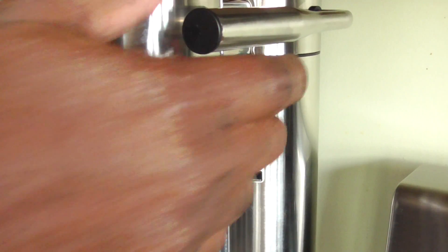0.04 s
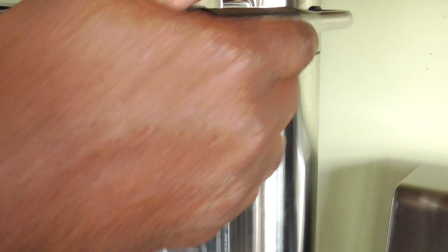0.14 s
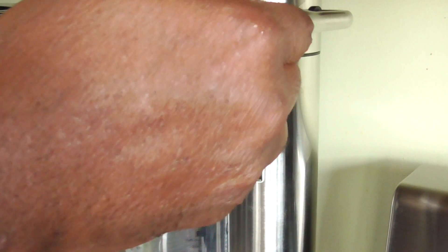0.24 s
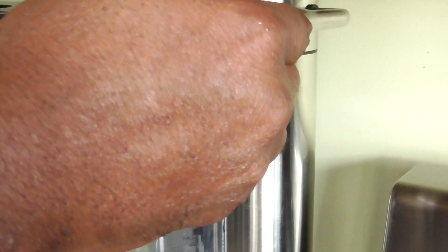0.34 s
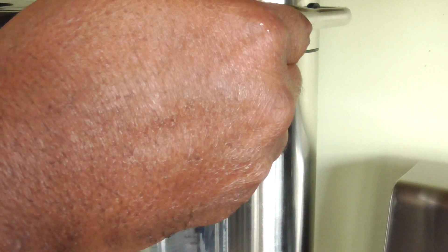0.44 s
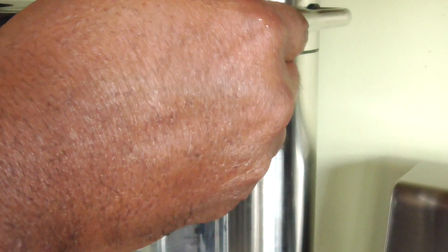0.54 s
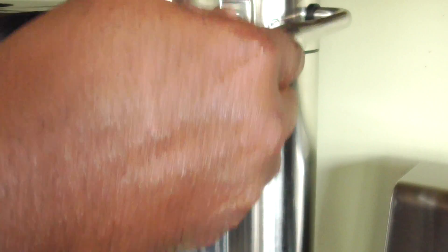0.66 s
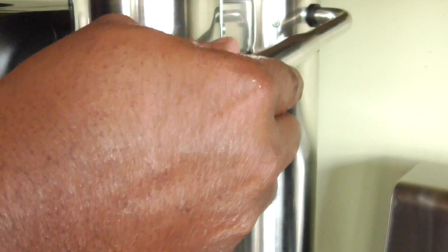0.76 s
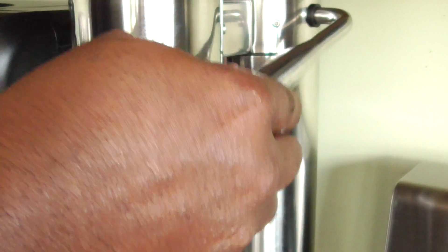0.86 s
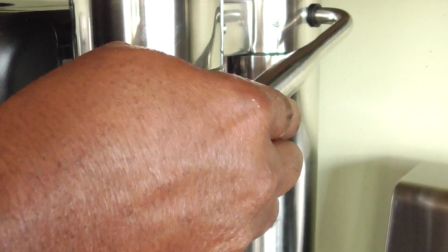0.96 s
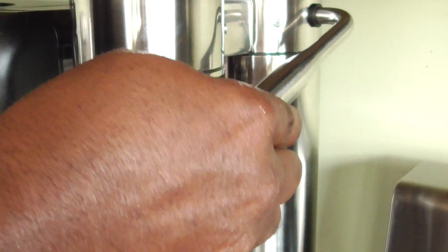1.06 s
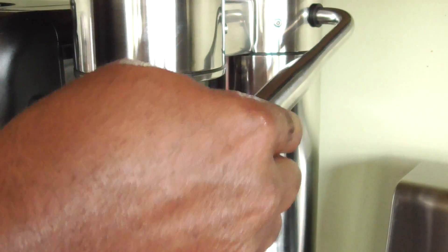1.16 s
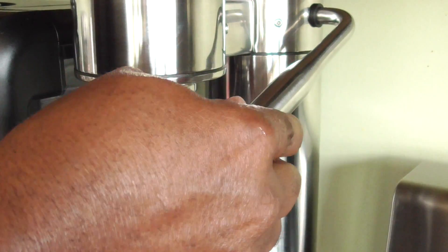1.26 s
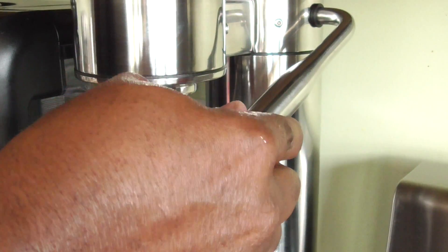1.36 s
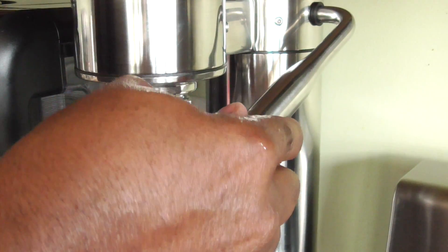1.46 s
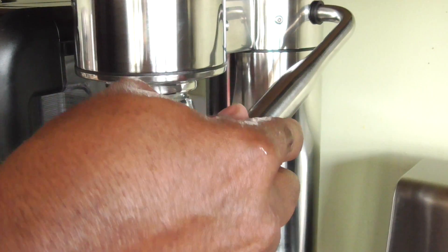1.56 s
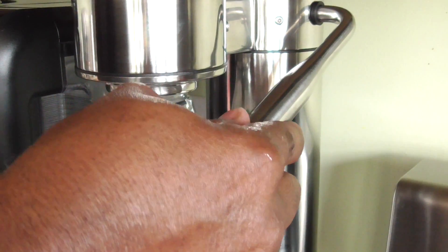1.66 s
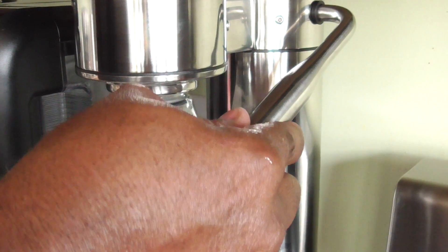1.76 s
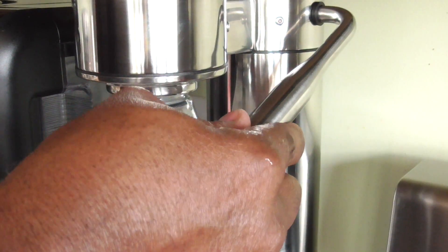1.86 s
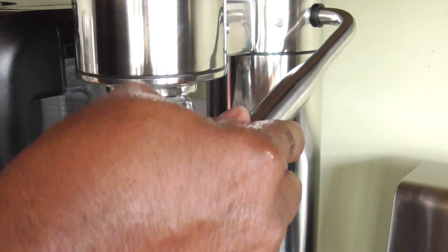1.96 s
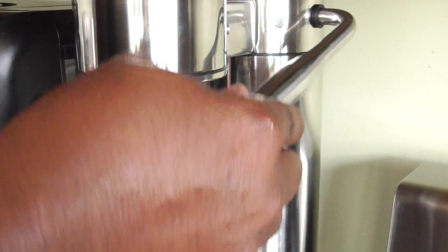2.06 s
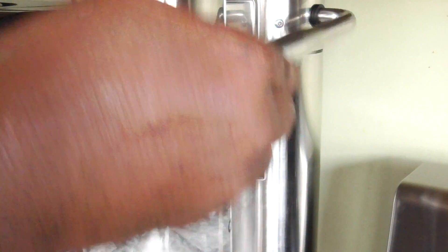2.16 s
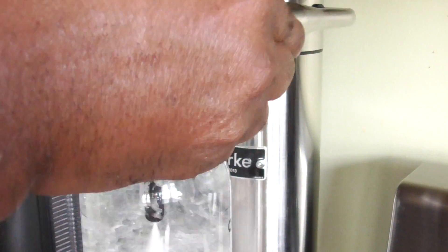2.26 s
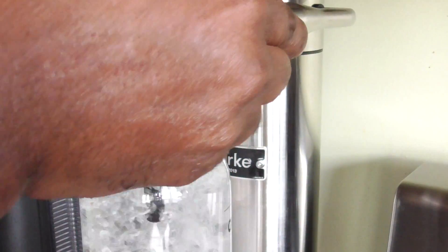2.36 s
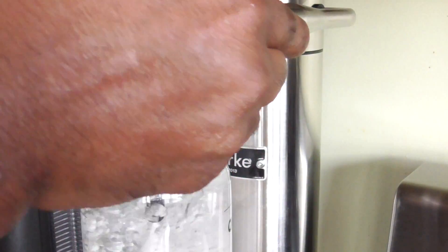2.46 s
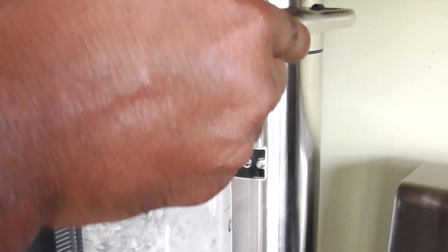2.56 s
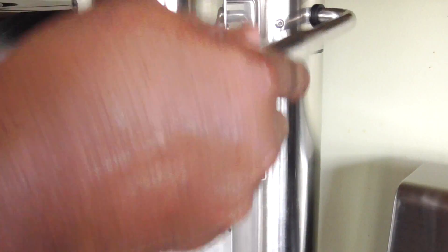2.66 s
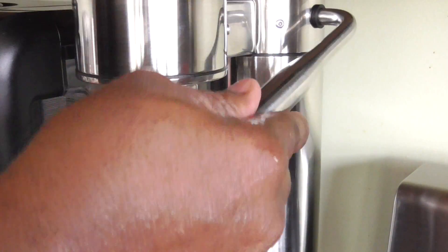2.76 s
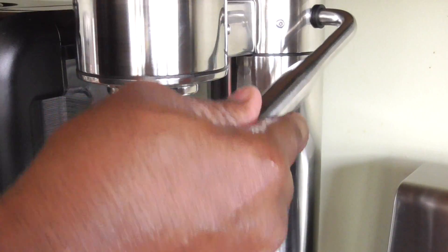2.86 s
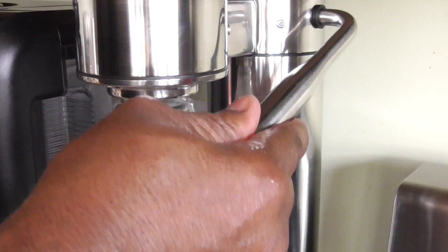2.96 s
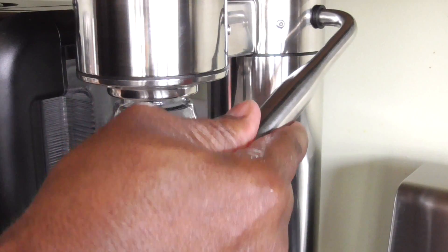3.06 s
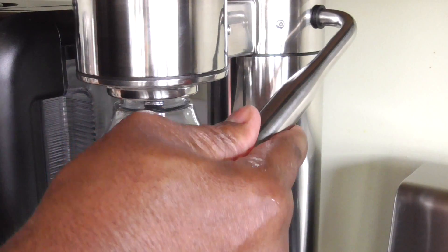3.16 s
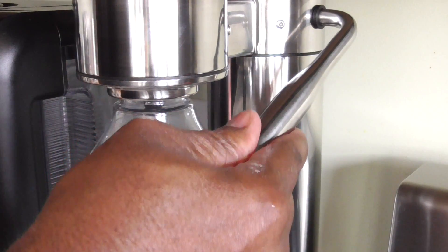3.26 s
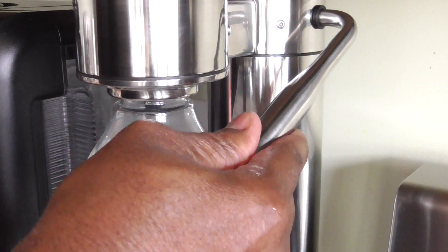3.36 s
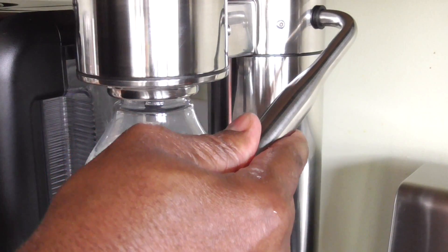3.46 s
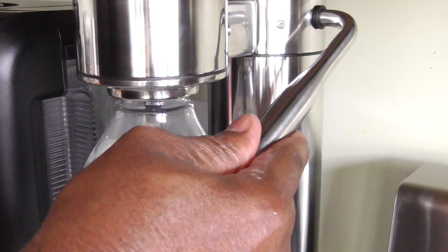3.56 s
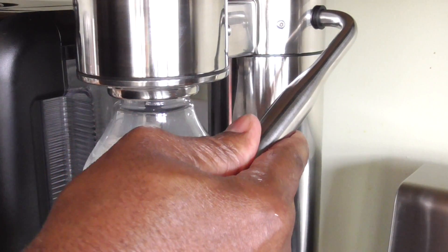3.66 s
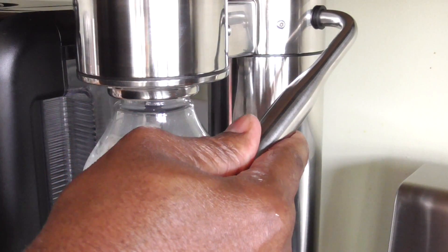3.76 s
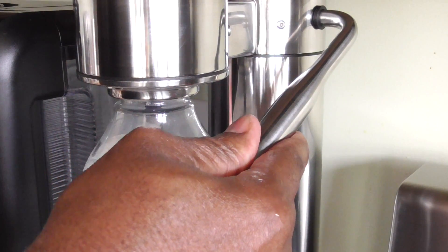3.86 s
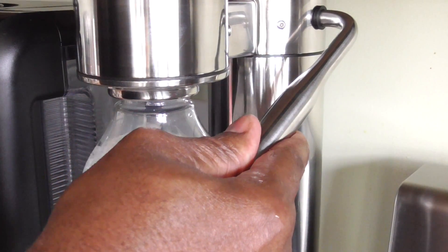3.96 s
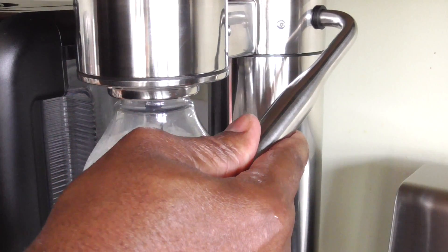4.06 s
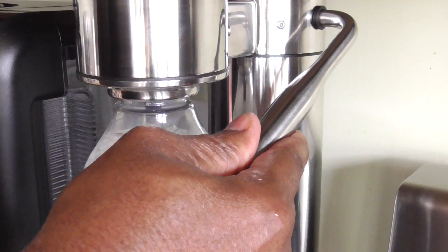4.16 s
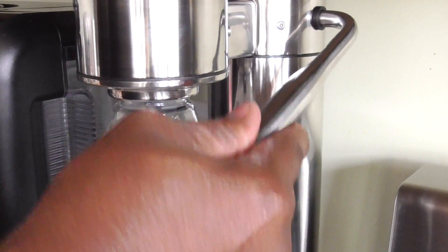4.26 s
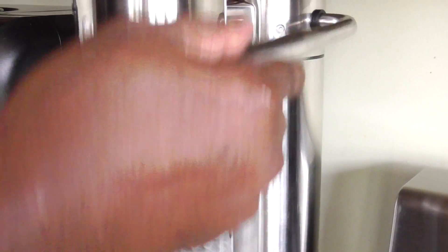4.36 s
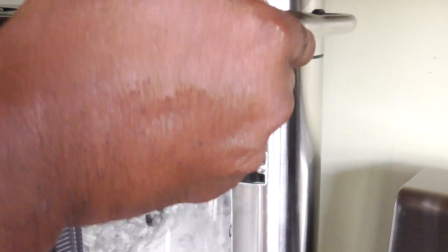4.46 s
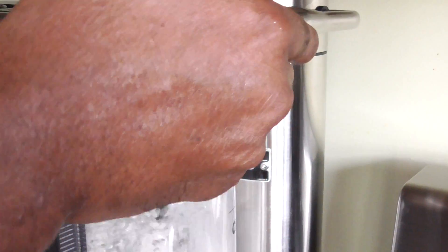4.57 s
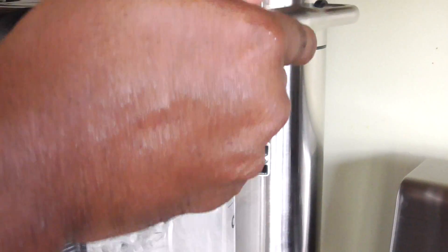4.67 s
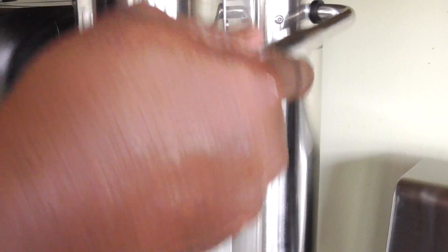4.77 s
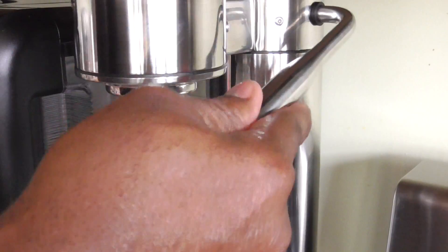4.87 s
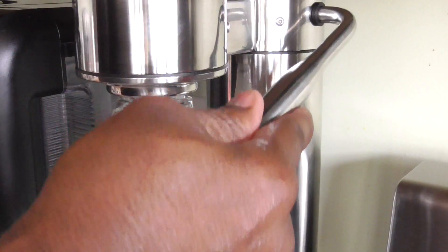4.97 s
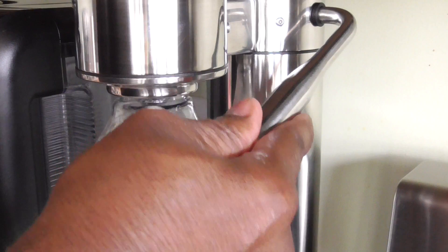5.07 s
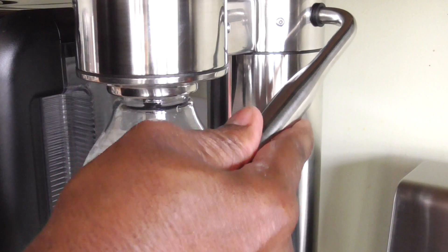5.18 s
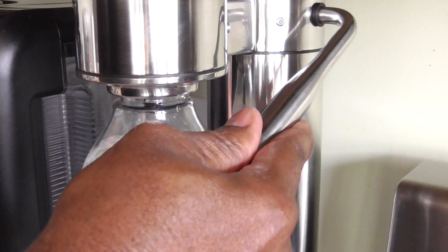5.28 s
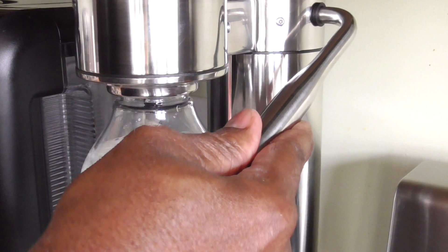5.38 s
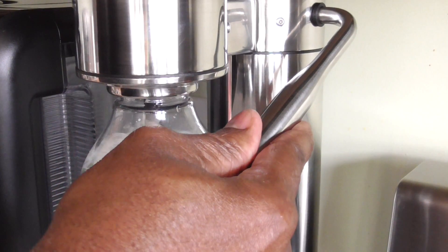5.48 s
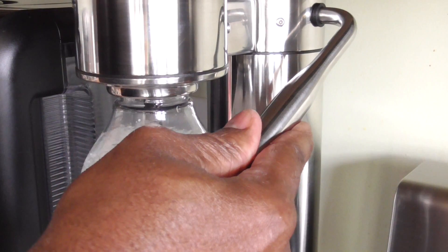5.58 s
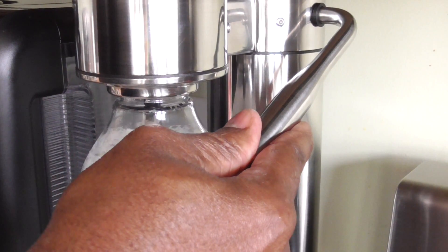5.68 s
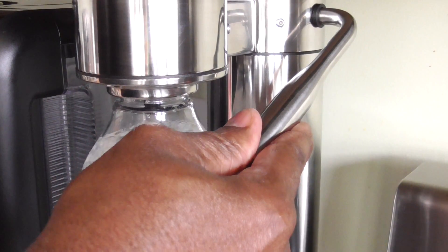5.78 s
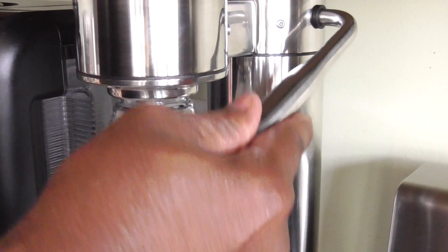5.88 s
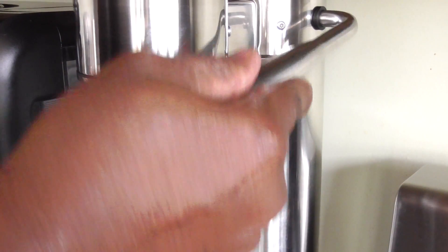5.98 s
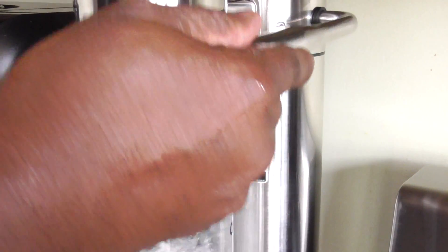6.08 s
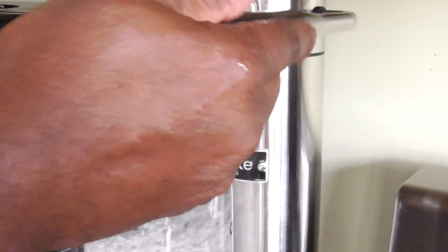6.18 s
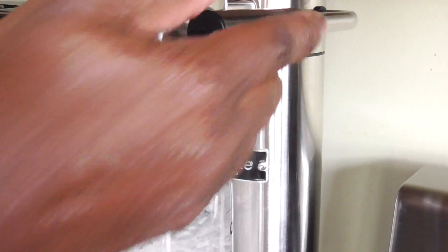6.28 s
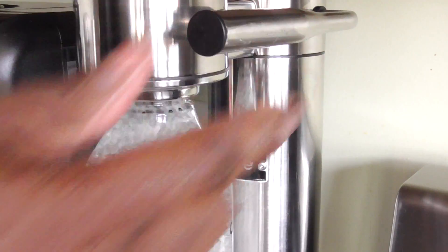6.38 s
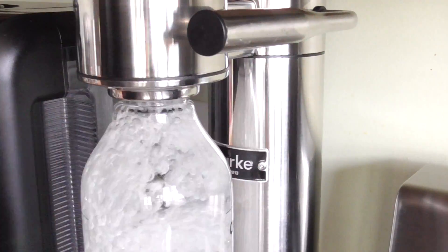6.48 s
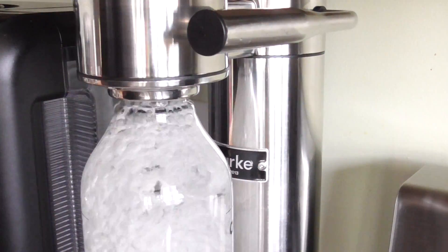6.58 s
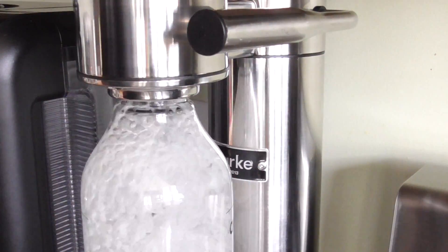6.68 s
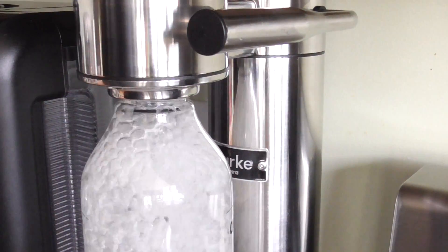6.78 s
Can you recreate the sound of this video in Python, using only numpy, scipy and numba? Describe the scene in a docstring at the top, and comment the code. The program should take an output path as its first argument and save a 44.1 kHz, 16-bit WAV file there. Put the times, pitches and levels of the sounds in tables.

```python
"""Faint ticks of a focus motor over kitchen hum, then the knock of a steel lever: a countertop soda
maker, close by, is pulled three times. On each pull gas whistles through the nozzle and boils into
the water until the bottle is at full pressure. The relief valve then pops, and on the last two pulls
it chatters and squeals. As the lever comes back up, the gas hisses out and the water froths."""
import sys
import numpy as np
from scipy import signal
from scipy.fft import rfft, irfft, next_fast_len
from scipy.io import wavfile
from scipy.ndimage import uniform_filter1d
from numba import njit

SR = 44100
rng = np.random.default_rng(int(sys.argv[2]) if len(sys.argv) > 2 else 0)


def generate_wav(signal):
    """Clip the signal to [-1, 1] and save it as 16-bit WAV at the path in sys.argv[1]."""
    frames = np.transpose(np.atleast_2d(signal))
    scaled = np.clip(frames, -1, 1) * 32767
    pcm = np.round(scaled).astype(np.int16)
    wavfile.write(sys.argv[1], SR, pcm)


N = 301291
T = np.arange(N) / SR

# Levels in the tables are fader settings; each layer adds its own trim.
# kitchen air: freq_hz, gain_db
AIR_EQ = [(25, -8), (70, 1), (150, 1.5), (300, 0), (550, -2), (930, -4), (1300, -15), (2400, -26),
          (4200, -24.5), (6000, -30), (9000, -23), (16000, -29)]
# motor hum: pitch_hz, level_db
HUM_PARTIALS = [(119, -64.5), (237, -61)]
# room tone sinks under the gas, then partly returns: time_s, gain_db
ROOM_FADER = [(1.28, 0), (2.3, -14), (6.83, -5.5)]

# the lever takes up its play: start_s, level_db, scrape_boost_db
LEVER_KNOCKS = [(.488, -57, 7), (0.7173, -30.5, 1.5), (.7245, -29.5, 0), (.753, -47, 5), (1.044, -49, -6)]
# ring of the steel lever: pitch_hz, level_db, t60_s
LEVER_MODES = [(342, -6, .31), (1007, 0.5, .15), (1464, -11, .22), (2056, -13, 0.14), (2525, -12, .22)]
# ring of the machine head at a damping of 1: pitch_hz, level_db, t60_s
HEAD_MODES = [(339.5, -12, 0.11), (561, -9, 0.041), (704, 2.5, 0.045), (780, -5, 0.035), (840, -2.5, 0.059),
              (945, -1, 0.038), (1050, 0, 0.035), (1115, -11.5, 0.031), (1510, -13.5, 0.033),
              (1800, -11.5, 0.029), (4180, -12, .02)]
# lever scrape: freq_hz, gain_db
SCRAPE_EQ = [(150, -6), (340, 9), (520, 2), (1500, 3.5), (4200, -4.5), (9000, -11.5), (15000, -22)]

# first big bubbles out of the nozzle: start_s, pitch_hz, level_db, ring_cycles
GULP_BUBBLES = [(1.2905, 758, -3.5, 53), (1.295, 685, -17, 36), (1.293, 1420, -20, 77),
                (1.524, 641, -10, 28), (1.541, 805.4, -10, 25)]
# their spray: freq_hz, gain_db
SPRAY_EQ = [(200, -22), (450, 0.5), (5000, 0.5), (7000, -6), (12500, -10.5), (15000, -22)]
# lever pulls, with their jet, large and fine bubbles and churn: crack_s, open_s, full_s, jet_db,
# large_first_db, large_mid_db, large_first_hz, fine_first_db, fine_last_db, churn_db
LEVER_PULLS = [(1.287, 1.323, 2.26, -47.5, -39.5, -27, 863, -45.5, -29.5, -43),
               (3.011, 3.037, 3.975, -48.5, -37.5, -30.5, 900, -41, -30, -46),
               (5.039, 5.129, 5.305, -49.5, -49.5, -42.5, 1108, -37, -34.5, -65)]
# hiss of the gas jet: freq_hz, gain_db
JET_EQ = [(100, -23), (400, -8), (1000, 2.5), (4500, 0.5), (6400, 0), (8300, 1.5), (11000, -1), (12600, -8),
          (13600, -20), (16000, -28)]
# bottle wall, heard on the fine bubbles: freq_hz, gain_db
BOTTLE_EQ = [(2000, 5), (2700, -4), (3200, -1), (4200, -2.5), (4550, 3), (4800, -5), (5100, 4),
             (6200, -4.5)]
# rumble of moving water: freq_hz, gain_db
WATER_EQ = [(45, -29), (80, -14), (100, -16.5), (116, 1.5), (128, 0.5), (160, -13), (200, -9), (265, -22),
            (380, -14), (600, -24.5), (1200, -40)]
# big heaves of the water: peak_s, level_db
WATER_HEAVES = [(1.56, -37.5), (1.76, -38), (3.39, -43), (3.61, -45.5), (4.23, -40.5), (5.51, -46)]
# runs of like-sized bubbles: start_s, end_s, first_hz, last_hz, level_db
GURGLES = [(1.402, 1.435, 1050, 760, -35), (1.435, 1.495, 1760, 2080, -33.5),
           (1.526, 1.581, 647, 1300, -31), (1.554, 1.6, 1700, 2000, -29.5), (1.68, 1.76, 960, 880, -31),
           (1.8, 1.87, 1300, 1200, -29), (1.85, 1.93, 740, 1040, -30), (2.02, 2.065, 1120, 1400, -31),
           (2.176, 2.22, 1020, 980, -30.5), (2.2, 2.228, 3550, 3950, -30.5),
           (2.255, 2.299, 3200, 2700, -35), (3.33, 3.385, 1080, 930, -29.5), (3.585, 3.63, 1250, 1700, -34),
           (3.465, 3.51, 4250, 3900, -34), (3.613, 3.638, 3998, 4130, -31), (3.695, 3.718, 1000, 1000, -33),
           (3.753, 3.798, 3200, 2950, -35), (3.802, 3.828, 990, 960, -31), (3.818, 3.842, 3300, 3150, -33)]

# passage that the whistle sounds through: freq_hz, gain_db
NOZZLE_EQ = [(2000, -19.5), (3000, -11), (4400, -22), (6000, -19.5), (6800, -4), (7950, 1), (8120, -7),
             (8950, -2), (9900, -6.5), (10120, -2), (11200, -17), (12100, -16.5), (14000, -38)]
# warble as the valve is first eased open: time_s, pitch_hz, level_db, squeal_db
WARBLE_PATH = [(1.522, 2130, -51, 16), (1.534, 2090, -29, 17), (1.56, 1850, -33.5, 17.5),
               (1.582, 1890, -34.5, 17), (1.601, 2130, -29.5, 24), (1.609, 2470, -27, 19),
               (1.634, 2180, -32, 18.5), (1.668, 2080, -29.5, 5), (1.682, 1950, -28, 6),
               (1.723, 1845, -32, 3), (1.742, 2225, -28.5, 0), (1.785, 2205, -30, -2),
               (1.808, 2090, -29, -2), (1.826, 1985, -37, -2)]
# chirps as the valve shifts: peak_s, top_hz, low_hz, level_db, squeal_db
NOZZLE_CHIRPS = [(3.068, 2990, 2380, -30, 12), (3.147, 2480, 2190, -29, 0), (5.137, 3335, 2400, -29.5, 4),
                 (5.208, 2450, 2260, -32.5, 8)]
# the whistle locks on a note: start_s, end_s, pitch_hz, level_db, roughness_ratio
HELD_NOTES = [(1.822, 2.066, 1984, -24, .0045), (2.091, 2.15, 2240, -34, .012),
              (3.21, 3.35, 2235, -31, .005), (3.367, 3.445, 1990, -26.5, .015),
              (3.451, 3.64, 2022, -31, .005), (3.645, 3.976, 1984, -24.5, .003),
              (5.228, 5.308, 2245, -31, .004)]

# relief valve snapping open: peak_s, level_db, rise_s, t60_s
VALVE_POPS = [(2.316, -20, .05, 0.072), (3.048, -21, .02, 0.039), (3.9825, -11.5, .001, 0.015),
              (5.312, -18.5, .002, 0.024)]
# spells of valve chatter: start_s, end_s, hiss_db, knock_db
CHATTER_SPELLS = [(3.983, 4.132, -24, -35.5), (4.171, 4.583, -23, -34), (5.314, 5.546, -23.5, -33.5),
                  (5.593, 6.103, -24.5, -36), (6.164, 6.312, -24, -36)]
# gas spat from the valve: freq_hz, gain_db
SPIT_EQ = [(80, -23), (200, -13.5), (500, -12), (1400, -7.5), (2400, -7), (4200, -2.5), (6400, -4),
           (7100, 3), (7500, 0), (10500, -0.5), (12500, -3), (13400, -10), (14500, -8.5), (16000, -21)]
# resonances of the valve's port: centre_hz, width_hz, gain_db
PORT_PEAKS = [(1800, 140, 3), (5300, 95, 5.5), (7150, 200, 1.5)]

# gas let out as the lever rises:
# start_s, end_s, attack_s, release_s, rush_db, top_db, note_db, note_first_hz
VENT_BLASTS = [(2.318, 2.789, .05, 0.15, -23, -27, -28, 14000),
               (4.594, 4.775, 0.047, 0.48, -24, -26, -26.5, 12050),
               (6.308, 6.394, 0.13, 0.75, -26.5, -27.5, -29.5, 11420),
               (6.757, 6.83, 1.3, .8, -31, -34, -34, 11600)]
# body of the vent's rush: freq_hz, gain_db
RUSH_EQ = [(150, -40), (600, -28), (1700, -19.5), (3600, -11.5), (4400, -6), (6400, -4.5), (7000, -5),
           (7800, 1), (9000, -2), (10500, -8), (13000, -23)]
# its sharp top: freq_hz, gain_db
TOP_EQ = [(6000, -52), (9500, -26.5), (10900, -5), (11700, 1.5), (12400, -2.5), (13400, -3.5), (15000, -5),
          (16000, -12)]
# hollow resonances and notches of the vent passage: centre_hz, width_hz, gain_db
VENT_PEAKS = [(1480, 120, 5.5), (1690, 160, -10), (2250, 200, 3.5), (2630, 110, -14), (2870, 130, 5),
              (3370, 220, 5.5), (3620, 130, -14), (5880, 200, 2)]
# the water froths as the pressure drops: start_s, end_s, level_db
FROTH_BOUTS = [(2.32, 2.327, -47.5), (2.75, 2.816, -48), (4.741, 4.899, -52.5), (6.338, 6.35, -37.5),
               (6.547, 6.83, -42.5)]
# the relief valve hangs half open: start_s, end_s, pitch_hz, hiss_db, partial_1_db ... partial_5_db
VALVE_STALLS = [(4.138, 4.169, 1783, -25, -47, -46, -48, -40, -41),
                (5.555, 5.618, 1812, -25.5, -45, -39.5, -48, -36, -39),
                (6.112, 6.16, 1820, -27.5, -42, -47, -36.5, -42, -33.5)]

# first echoes off hard surfaces close by: left_delay_s, right_delay_s, level_db
EARLY_ECHOES = [(.00085, 0.00093, -19.5), (.0034, 0.0035, -14.5)]
# the machine stands a little to the right: freq_hz, left_minus_right_db
PAN_EQ = [(110, 1.5), (700, -0.5), (2400, -1.5), (4400, -1.5), (8100, -2.5), (15000, -8)]

TOP_HZ = 15700


def undb(db):
    """Decibels to gain."""
    return np.exp(np.asarray(db) * (np.log(10) / 20))


def unit(x):
    """Scale to rms 1."""
    return x / np.sqrt(np.mean(x ** 2))


def curve(rows, column=1):
    """One column of a table, joined by straight lines in time."""
    rows = np.array(rows)
    return np.interp(T, rows[:, 0], rows[:, column])


def walk(rate_hz, t=T):
    """Smooth random drift with a spread near 1."""
    knots = rng.standard_normal(N // 20)
    return np.interp(t * rate_hz, np.arange(len(knots)), knots)


def gate(start, end, attack_s, release_s, t=T):
    """Full between start and end; rises and falls by 60 dB over attack and release."""
    outside = np.maximum(start - t, 0) / attack_s + np.maximum(t - end, 0) / release_s
    return undb(-60 * np.minimum(outside, 5))


def burst(start, t60):
    """A hard attack and an exponential fall."""
    return (T >= start) * undb(-60 * np.clip((T - start) / t60, 0, 5))


def progress(start, end):
    """A ramp from 0 to 1 between two moments."""
    return np.clip((T - start) / (end - start), 0, 1)


def fade(start, db_per_s, t=T):
    """A steady loss of level after the start."""
    return undb(-db_per_s * np.maximum(t - start, 0))


def colour(x, eq, amount=1):
    """Filter through an EQ curve of freq_hz, gain_db points."""
    hz, db = np.transpose(eq)
    size = next_fast_len(N + 4096, real=True)
    f = np.maximum(np.fft.rfftfreq(size, 1 / SR), 1)
    gain = undb(amount * np.interp(np.log(f), np.log(hz), db))
    return irfft(rfft(x, size) * gain, size)[..., :N]


def pipe(eq, peaks):
    """An EQ curve with the resonances and notches of a passage laid over it."""
    hz, db = np.transpose(eq)
    f = np.geomspace(hz[0], hz[-1], 1200)
    lift = sum(gain_db / (1 + (2 * (f - centre) / width) ** 2) for centre, width, gain_db in peaks)
    return np.column_stack([f, np.interp(np.log(f), np.log(hz), db) + lift])


def hiss(eq, spread):
    """Stereo turbulence, wider towards the treble."""
    side = spread * colour(rng.standard_normal(N), [(300, -4.5), (3000, -5), (9000, 0)])
    return unit(colour(rng.standard_normal(N) + side * np.array([[1], [-1]]), eq))


def reverberate(x, t60, wet_db):
    """Add a short dense tail, different at each ear."""
    t = T[:SR // 3]
    tail = rng.standard_normal((2, len(t))) * undb(-60 * t / t60) * (t > .002)
    tail /= np.sqrt(np.sum(tail ** 2, axis=1, keepdims=True))
    return x + undb(wet_db) * signal.fftconvolve(np.atleast_2d(x), tail, axes=1)[:, :N]


@njit
def rings(start, hz, cycles, size, glide):
    """Sine pings that die by 60 dB over their cycles; glide bends them upward like bubbles."""
    out = np.zeros(N)
    for k in range(len(start)):
        first, count = int(start[k] * SR), int(cycles[k] / hz[k] * SR) + 2
        spring = 2 * np.sin(np.pi * hz[k] / SR)
        stiffen = (2 * np.sin(np.pi * hz[k] * (1 + glide) / SR) - spring) / count
        loss, swell = np.exp(-6.9 / count), np.exp(-spring / 4)
        gain, onset, place, speed = size[k], 1., 0., 1.
        for i in range(first, min(first + count, N)):
            place += spring * speed
            speed -= spring * place
            spring, gain, onset = spring + stiffen, gain * loss, onset * swell
            out[i] += gain * (1 - onset) * place
    return out


def bubbles(centre_hz, per_s, scatter, cycles, range_db):
    """A stream of bubbles scattered round a centre pitch, levelled to an rms of 1."""
    when, pitch, life, size = rng.random((int(per_s * N / SR), 4)).T
    when = when * T[-1]
    octaves = scatter * .5 * np.log((pitch + .02) / (1.02 - pitch))
    hz = np.interp(when, T, centre_hz + 0 * T) * 2 ** octaves
    gain = undb(-range_db * size) * np.sqrt(hz)
    stream = rings(when, np.minimum(hz, SR / 3), cycles * (.5 + life), gain, glide=0.083)
    return stream / np.sqrt(np.abs(uniform_filter1d(stream ** 2, size=1400)) + 1e-9)


def room_tone():
    """The bed: kitchen air and the wavering hum of a motor."""
    hum = 0
    for hz, db in HUM_PARTIALS:
        phase = 2 * np.pi * np.cumsum(hz * (1 + 0.0058 * walk(8))) / SR
        hum += undb(db) * np.sqrt(2) * np.sin(phase)
    air = hiss(AIR_EQ, spread=0.91) * undb(-54.5 + .8 * walk(5.4))
    return (air + hum) * undb(curve(ROOM_FADER))


def focus_ticks(start_s=.1269, step_s=.01669, count=69, low_hz=2400., high_hz=3750., cycles=20.):
    """A small focus motor close by steps evenly, ticking faintly on two notes in turn."""
    steps = np.arange(count)
    hz = np.where(steps % 2, high_hz, low_hz)
    gain = undb(-50 - 13 * rng.random(count)) * low_hz / hz
    return rings(start_s + step_s * steps, hz, np.full(count, cycles), gain, glide=0.)


def lever(ring_db=-11, tail_db=-19, tail_s=0.28):
    """The lever takes up its play: a knock through the head, a short scrape, then ringing steel."""
    push = sum(undb(db) * burst(s, 0.0043) for s, db, _ in LEVER_KNOCKS) * rng.standard_normal(N)
    t = T[:SR // 2]
    steel = sum(undb(db - 60 * t / t60) * np.sin(2 * np.pi * hz * t) for hz, db, t60 in LEVER_MODES)
    ringing, scrape = np.zeros((2, N))
    for s, db, boost_db in LEVER_KNOCKS:
        ringing[int(s * SR):][:len(t)] += undb(db + ring_db) * steel
        scrape += undb(db + boost_db) * (burst(s, 0.037) + undb(tail_db) * burst(s, tail_s))
    return 0.27 * head(push, damping=0.53) + ringing + 0.64 * scrape * hiss(SCRAPE_EQ, spread=.5)


def head(push, damping):
    """The machine head rings with whatever pushes it."""
    t = T[:SR // 5]
    ring = sum((-1) ** k * undb(db - 60 * t * damping / t60) * np.sin(2 * np.pi * hz * t)
               for k, (hz, db, t60) in enumerate(HEAD_MODES))
    return signal.fftconvolve(push, ring / np.abs(ring).max())[:N]


def gulps(rise_s=0.0075):
    """Big bubbles swell over a few cycles and ring; the first comes with a spurt of spray."""
    out = 0
    for s, hz, db, cycles in GULP_BUBBLES:
        envelope = burst(s, cycles / hz) * progress(s, s + rise_s) ** 2
        out += undb(db) * envelope * np.sin(2 * np.pi * hz * (T - s))
    spray_db = np.interp(T, [1.278, 1.296, 1.312, 1.335], [-56, -26.5, -39, -52], left=-200, right=-200)
    return out + undb(spray_db) * hiss(SPRAY_EQ, spread=.4)


def injection(seep_db=-17.5, overrun_s=.04, rise_oct=0.36, fade_db=7.5, clump_db=1.4, wander_oct=.12):
    """The jet hisses and breaks into bubbles in the bottle; rising pressure favours the fine ones."""
    jet_gain = large_gain = fine_gain = 0
    large_hz = LEVER_PULLS[0][6]
    for crack, opened, full, jet_db, early_db, mid_db, first_hz, first_db, last_db, _ in LEVER_PULLS:
        # gas seeps as the valve cracks, then flows fully until just after the bottle is full
        opening = undb(seep_db * (1 - progress(crack, opened) ** 2))
        flow = gate(crack, full + overrun_s, 0.017, 0.09) * opening
        filled = progress(opened, full)
        jet_gain += flow * undb(jet_db)
        # large bubbles peak in mid-pull and shrink as the pressure builds
        drop_db = np.where(filled < .5, mid_db - early_db, fade_db) * (2 * filled - 1) ** 2
        large_gain += flow * undb(mid_db - drop_db)
        large_hz = np.where(T >= crack, first_hz * 2 ** (rise_oct * filled), large_hz)
        fine_gain += flow * undb(first_db + (last_db - first_db) * filled ** 0.74)
    jet = hiss(JET_EQ, spread=0.72) * undb(11.5 + 2.1 * walk(90)) * jet_gain
    # gas tears off the jet in slugs, so the bubbles come in clumps of like size
    large_hz = large_hz * 2 ** (wander_oct * walk(40))
    large = bubbles(large_hz, per_s=1100, scatter=0.41, cycles=40, range_db=8)
    large *= large_gain * undb(-3.3 + clump_db * walk(45))
    fine_hz = 3350 * 2 ** (wander_oct * walk(60))
    fine = bubbles(fine_hz, per_s=2600, scatter=0.48, cycles=65, range_db=9)
    fine = colour(fine, BOTTLE_EQ) * fine_gain * undb(clump_db * walk(35))
    return jet + reverberate(large + fine + gurgles(), t60=0.09, wet_db=-7)


def water(lag_s=0.059, rise_s=0.32, settle_s=0.18, heave_s=0.036, chatter_db=-46.5, slosh_db=-61):
    """Low end: the water churns as gas passes through, heaves now and then, and sloshes as it froths."""
    pulls = [gate(opened + lag_s, full, rise_s, settle_s) * undb(db - 4 * progress(opened, full))
             for _, opened, full, *_, db in LEVER_PULLS]
    spells = [gate(start, end, rise_s, settle_s) * undb(chatter_db) for start, end, *_ in CHATTER_SPELLS]
    churn = np.max(pulls + spells, axis=0)
    heaves = sum(undb(db) * np.exp(-((T - s) / heave_s) ** 2) for s, db in WATER_HEAVES)
    slosh = undb(slosh_db) * sum(froth_swell(start, end) for start, end, _ in FROTH_BOUTS)
    motion = np.sqrt(churn ** 2 + heaves ** 2 + slosh ** 2)
    return hiss(WATER_EQ, spread=0.32) * motion * undb(2 * walk(18))


def gurgles(cycles=36., count=24, scatter_oct=.1):
    """Quick runs of bubbles that glide in pitch as they split or merge."""
    start, end, first_hz, last_hz, db = np.transpose(GURGLES)[..., None]
    jitter, pitch = rng.random((len(GURGLES), 2, count)).swapaxes(0, 1)
    along = (np.arange(count) + jitter) / count
    when = start + (end - start) * along
    hz = first_hz * (last_hz / first_hz) ** along * 2 ** (scatter_oct * (2 * pitch - 1))
    gain = undb(db) * np.sqrt(4 * np.log(1000) * (end - start) * hz / (count * cycles))
    return rings(when.ravel(), hz.ravel(), np.full(hz.size, cycles), gain.ravel(), glide=.025)


def nozzle_tone(t, hz, rough, squeal_db, waver=0.0014, flutter_db=1.6):
    """A wavering harmonic stack shaped by the nozzle; a narrow opening makes the low partials squeal."""
    hz = hz * (1 + waver * walk(35, t) + rough * walk(900, t))
    phase = 2 * np.pi * np.cumsum(hz) / SR
    orders = np.arange(1, 8)[:, None]
    partial_hz = orders * hz
    flutter = flutter_db * np.array([walk(45, t) for _ in orders])
    gains = undb(np.interp(partial_hz, *np.transpose(NOZZLE_EQ)) + flutter)
    gains /= np.sqrt(np.sum(gains ** 2, axis=0) / 2)
    squeal = undb(squeal_db * np.interp(partial_hz, [2400, 2900, 5500, 6800], [0, 1, 1, 0]))
    partials = gains * squeal * np.sin(orders * phase) * (partial_hz < TOP_HZ)
    return partials.sum(axis=0) * undb(flutter_db * walk(65, t))


def whistle(arc_s=0.029, droop=.012, droop_s=0.02008):
    """Gas sings in the nozzle: a rough warble, chirps that arch in pitch, and purer held notes."""
    out = np.zeros(N)
    near = (T > WARBLE_PATH[0][0]) & (T < WARBLE_PATH[-1][0])
    hz, db, squeal_db = (curve(WARBLE_PATH, column)[near] for column in (1, 2, 3))
    warble = nozzle_tone(T[near], hz, rough=0.024, squeal_db=squeal_db, waver=.008, flutter_db=3)
    out[near] = warble * undb(db - 1)
    for s, top_hz, low_hz, db, squeal_db in NOZZLE_CHIRPS:
        near = np.abs(T - s) < .12
        t = T[near]
        hz = low_hz + (top_hz - low_hz) * np.exp(-((t - s) / arc_s) ** 2)
        envelope = undb(db) * gate(s - .007, s, 0.064, .36, t)
        out[near] += nozzle_tone(t, hz, rough=0.026, squeal_db=squeal_db, waver=.005) * envelope
    for start, end, pitch_hz, db, rough in HELD_NOTES:
        near = (T > start - .05) & (T < end + .05)
        t = T[near]
        # a note slides up into tune, weakens as it is held and droops before it breaks
        outside_s = np.maximum(start - t, t - end)
        hz = pitch_hz * (1 - droop * np.exp(np.minimum(outside_s / droop_s, 1)))
        envelope = undb(db) * gate(start, end, .05, 0.059, t) * fade(start, db_per_s=9, t=t)
        out[near] += nozzle_tone(t, hz, rough, squeal_db=0) * envelope
    return out


def froth_swell(start, end):
    """The slow rise and fall of one bout of froth."""
    return gate(start, end, attack_s=0.47, release_s=0.37)


def relief_valve(chatter_hz=78.94, puff_s=0.0055, scatter_db=1.5):
    """The valve pops, or chatters on its seat: each lift spits gas and shakes the head."""
    gap, size = rng.standard_normal((700, 2)).T
    lifts = np.append(0, np.cumsum(np.clip(1 + .15 * gap[1:], .5, 2) / chatter_hz))
    latest = np.searchsorted(lifts, T, side="right") - 1
    age = (T - lifts[latest]) / puff_s
    strength = undb(scatter_db * size[latest])
    puffs = unit(np.exp(-age) * (1 - np.exp(-5 * age)) * strength)
    gas = knock = 0
    for start, end, hiss_db, knock_db in CHATTER_SPELLS:
        spell = gate(start, end, 0.018, 0.088) * fade(start, db_per_s=2)
        gas = np.maximum(gas, spell * undb(hiss_db))
        knock += spell * undb(knock_db)
    for start, end, _, hiss_db, *_ in VALVE_STALLS:
        gas = np.maximum(gas, gate(start, end, .04, .04) * undb(hiss_db))
    # when the seat hardly knocks, the valve stays open and the gas flows evenly
    depth = np.clip(knock / undb(-32), 0, 1)
    flow = (1 + depth * puffs) / np.sqrt(1 + 2 * depth * puffs.mean() + depth ** 2)
    kicks = np.diff(latest, prepend=0) * strength
    rattle = .045 * flow * rng.standard_normal(N)
    push = colour(kicks + rattle, [(40, -14), (300, -9), (700, -0.5)])
    body = unit(head(push, damping=.95)) * knock * undb(1)
    pops = sum(undb(db) * gate(s, s, rise_s, t60) for s, db, rise_s, t60 in VALVE_POPS)
    return hiss(pipe(SPIT_EQ, PORT_PEAKS), spread=0.57) * (flow * gas + pops) + body


def venting(seal_share=0.34, seal_s=0.092, trickle_db=-22.5, trickle_s=0.72):
    """Gas rushes from the open vent while the water froths up and fizzes."""
    rush_gain = top_gain = note = 0
    for start, end, attack_s, release_s, rush_db, top_db, note_db, first_hz in VENT_BLASTS:
        # part-way through its release the vent shuts quickly, and the last gas trickles out
        seal = gate(0, end + seal_share * release_s, attack_s, seal_s)
        blast = gate(start, end, attack_s, release_s) * seal
        trickle = undb(trickle_db) * gate(start, end, attack_s, trickle_s)
        flow = np.maximum(blast, trickle) * fade(start, db_per_s=8.5)
        rush_gain += flow * undb(rush_db)
        top_gain += flow * undb(top_db)
        note += flow * undb(note_db - 2) * vent_note(start, first_hz)
    rush = hiss(pipe(RUSH_EQ, VENT_PEAKS), spread=0.48) * rush_gain * undb(-0.5 + 0.79 * walk(120))
    top = hiss(TOP_EQ, spread=0.56) * top_gain * undb(-0.5 + walk(60))
    return rush + top + note + froth()


def vent_note(start, first_hz, rest_hz=11420, sag_s=.24, width_hz=1100):
    """A narrow band of turbulence rings at the vent; its pitch sags as the pressure falls."""
    hz = rest_hz + (first_hz - rest_hz) * np.exp(-np.maximum(T - start, 0) / sag_s)
    phase = 2 * np.pi * np.cumsum(hz) / SR
    return walk(width_hz) * np.cos(phase) + walk(width_hz) * np.sin(phase)


def froth():
    """Low foam and bright fizz rise as the pressure drops, heard through the vent passage."""
    foam = bubbles(742, per_s=700, scatter=0.7, cycles=16, range_db=4.5)
    fizz = bubbles(4120, per_s=2200, scatter=0.692, cycles=40, range_db=7)
    hollow = colour(undb(-2) * foam + undb(3.5) * fizz, pipe([(200, 0), (12000, 0)], VENT_PEAKS))
    envelope = sum(froth_swell(start, end) * undb(db) for start, end, db in FROTH_BOUTS)
    return reverberate(hollow, t60=0.086, wet_db=-11) * envelope


def stall_squeal(rough=0.0068, flutter_db=2):
    """The half-open relief valve squeals, favouring different overtones each time."""
    out = np.zeros(N)
    for start, end, pitch_hz, _, *partials in VALVE_STALLS:
        near = (T > start - .05) & (T < end + .05)
        t = T[near]
        phase = 2 * np.pi * np.cumsum(pitch_hz * (1 + rough * walk(600, t))) / SR
        tone = sum(undb(db + flutter_db * walk(60, t)) * np.sin(k * phase)
                   for k, db in enumerate(partials, 1))
        out[near] += np.sqrt(2) * tone * gate(start, end, .03, .03, t)
    return out


def kitchen(x):
    """Steel body, wall and counter give a hollow, metallic colour; the room adds its tail."""
    echoes = sum(undb(db) * np.array([np.roll(side, int(delay * SR)) for side, delay in zip(x, delays)])
                 for *delays, db in EARLY_ECHOES)
    return reverberate(x + echoes, t60=.2, wet_db=-11)


def scene():
    """The mix: the machine a little to the right, over the ticks and the room tone."""
    gas = whistle() + stall_squeal() + injection() + gulps() + water() + relief_valve() + venting()
    left, right = kitchen(gas + lever())
    machine = np.array([colour(left, PAN_EQ, amount=0.49), colour(right, PAN_EQ, amount=-0.5)])
    return machine + focus_ticks() + room_tone()


def record(dry):
    """Master EQ: thin the deep bass and cut the very top."""
    thin = signal.sosfilt(signal.butter(2, 65, "high", fs=SR, output="sos"), dry)
    return signal.sosfilt(signal.ellip(10, .2, 80, TOP_HZ, fs=SR, output="sos"), thin)


dry = scene()
out = record(dry)
generate_wav(out)
```